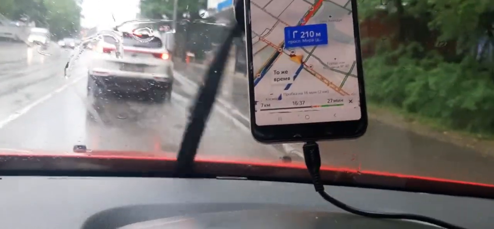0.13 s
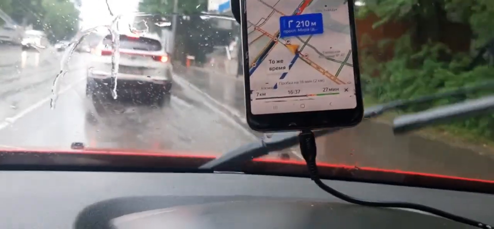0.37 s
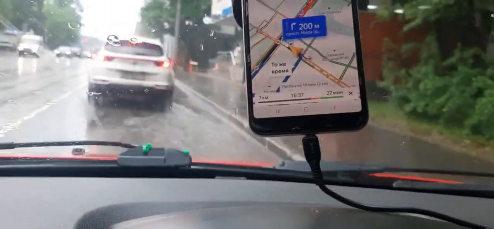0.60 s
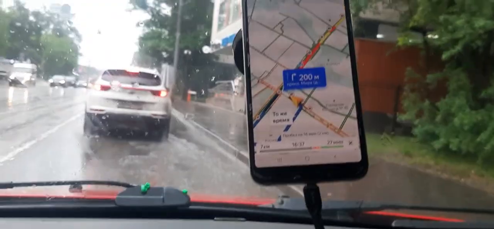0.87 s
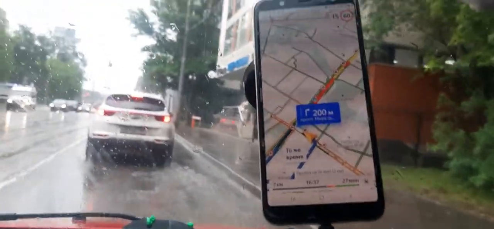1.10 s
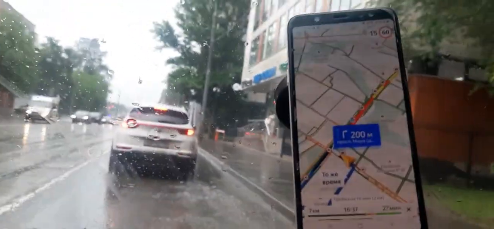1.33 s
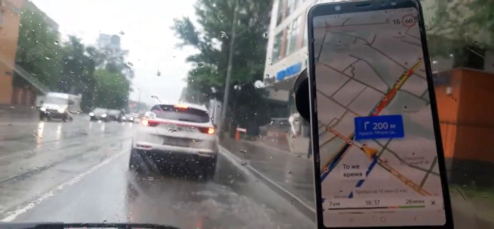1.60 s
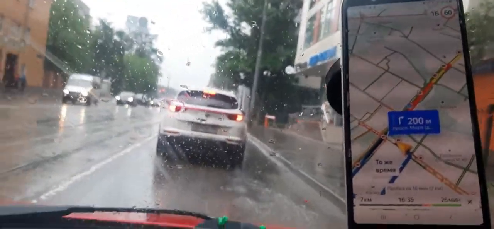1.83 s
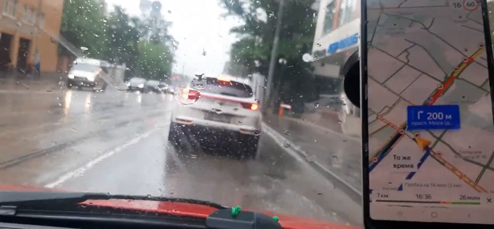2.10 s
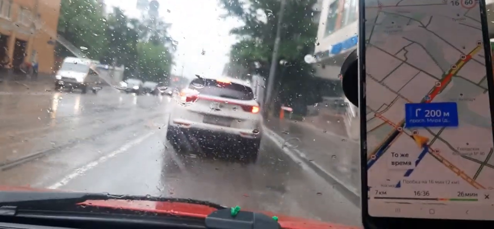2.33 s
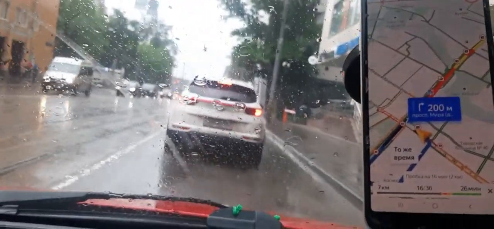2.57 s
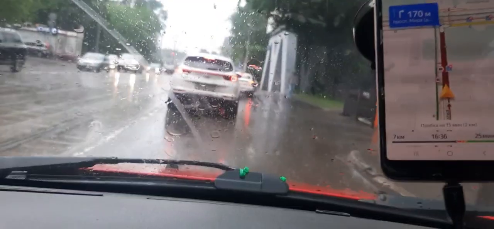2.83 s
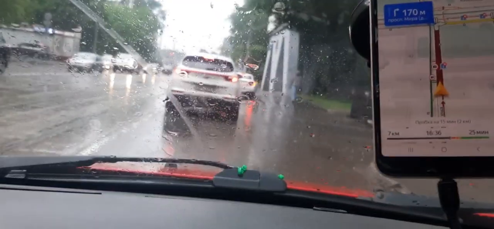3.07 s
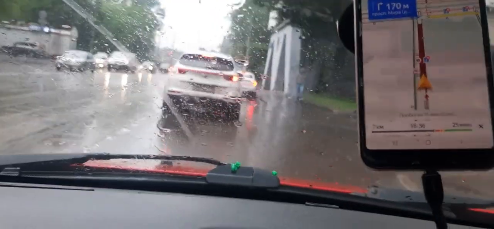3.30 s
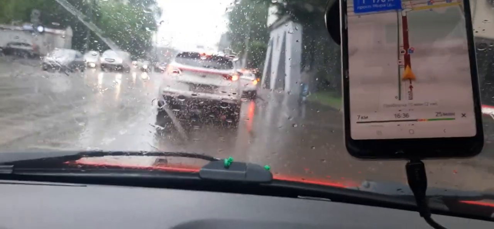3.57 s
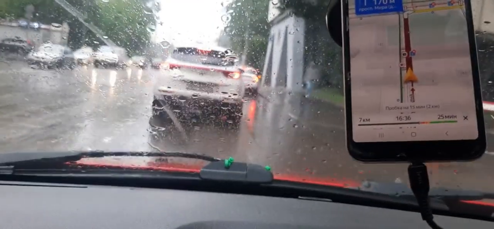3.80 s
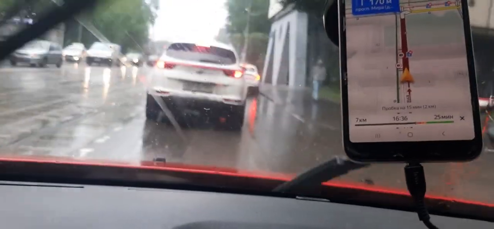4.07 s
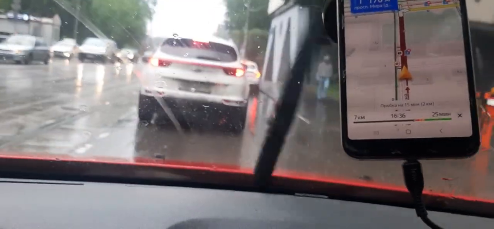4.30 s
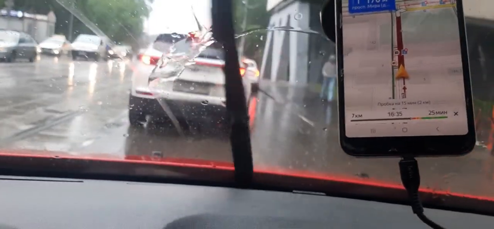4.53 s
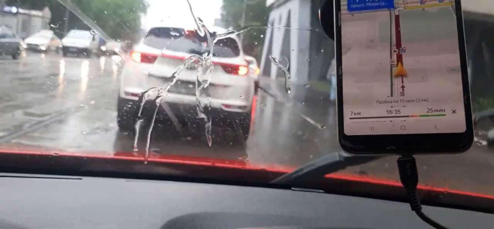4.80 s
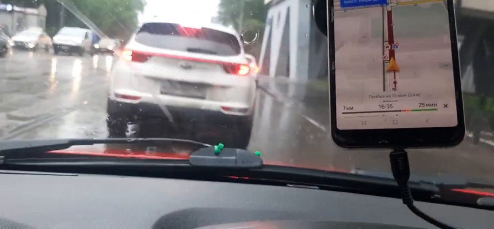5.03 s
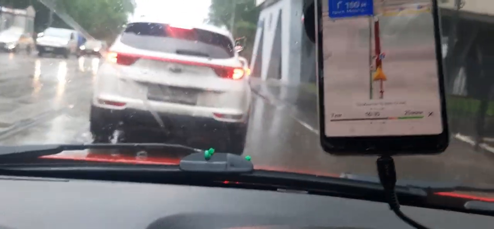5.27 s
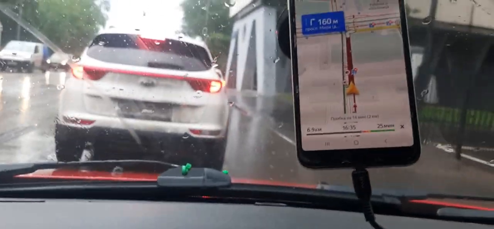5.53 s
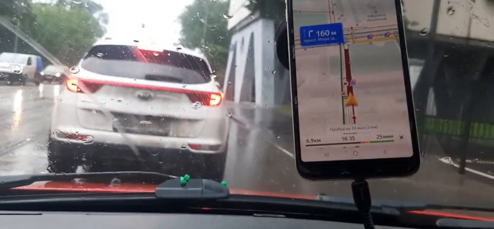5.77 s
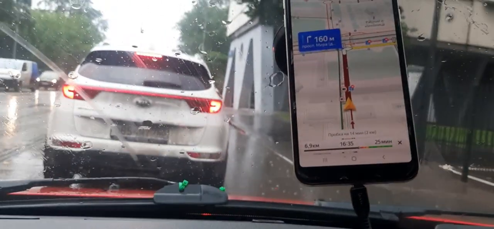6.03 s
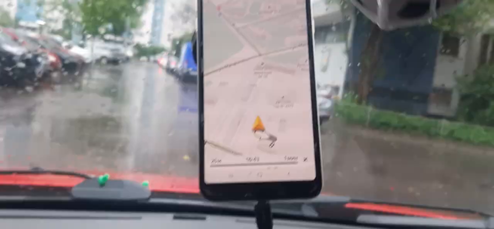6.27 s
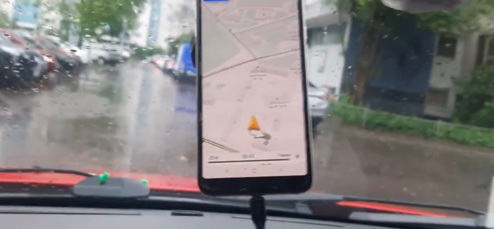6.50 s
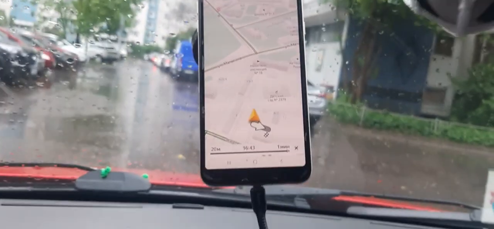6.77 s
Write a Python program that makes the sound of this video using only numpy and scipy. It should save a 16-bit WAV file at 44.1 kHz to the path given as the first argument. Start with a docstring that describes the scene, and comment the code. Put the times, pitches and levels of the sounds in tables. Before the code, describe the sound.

Inside a car creeping through heavy rain, low boom and road rumble under dense patter, wipers groaning and thudding twice, then an abrupt near-silence.

```python
"""Cabin boom and road rumble fill a car creeping through heavy rain: wandering sines over shaped noise.
The wipers groan over the screen twice (band noise, short hoots, thuds, knocks) and tick and clack (noise, modes).
Drops drum on roof and glass: noise bursts with panel modes, dense for the rain, single for the heavy drops.
The rain hisses and sings in narrow bands of noise. The sound thins, cuts, and returns very quietly."""
import sys
import numpy as np
from scipy import signal
from scipy.fft import rfft, irfft, next_fast_len
from scipy.io import wavfile

SR = 44100
rng = np.random.default_rng(int(sys.argv[2]) if len(sys.argv) > 2 else 0)


def natural_amplitude(level_db):
    """Convert a level in decibels to a linear amplitude factor, elementwise."""
    exponent = np.asarray(level_db, float) / 20
    return 10 ** exponent


def to_wav(s):
    """Save 16-bit WAV."""
    ch = np.atleast_2d(s).T  # columns
    pcm = np.round(np.clip(ch, -1, 1) * 32767)  # PCM
    wavfile.write(sys.argv[1], SR, pcm.astype(np.int16))


N = 303408


def evened(x):
    """Scaled to rms 1."""
    return x / np.sqrt(np.mean(x ** 2) + 1e-20)


def read(points, hz):
    """A table read on a log-frequency axis."""
    f, value = np.transpose(points)
    return np.interp(np.log(hz + 1), np.log(f + 1), value)


def track(tables, index):
    """One column of the tables, sample by sample; each table takes over 30 ms before its start."""
    t, out = np.arange(N) / SR, np.zeros(N)
    for rows in map(np.array, tables):
        out = np.where(t >= rows[0, 0] - .03, np.interp(t, rows[:, 0], rows[:, index]), out)
    return out


# Likeness of left and right: f/Hz, correlation
LIKENESS = [(60, 0.9), (120, 0.78), (240, 0.91), (480, 0.58), (950, 0.18), (1890, -0.2), (3770, 0.03),
            (7520, -0.0031), (15000, -0.041)]
# Stereo balance: f/Hz, left over right/dB
BALANCE = [(60, 5), (110, 5.5), (200, 4), (380, 2.5), (700, 3.0), (1290, 7), (2380, 9), (4400, -2),
           (8120, 5), (15000, 3)]


def pair(spectrum, length, peaks=()):
    """Two-channel noise, rms 1: shaped in frequency, alike in the bass, mostly leaning left."""
    hz = np.fft.rfftfreq(length, 1 / SR)
    a, b = rfft(rng.standard_normal((2, length)))
    same = np.clip(read(LIKENESS, hz), -1, 1)
    lean = natural_amplitude(read(BALANCE, hz) / 2)
    resonances_db = sum(top / (1 + (2 * (hz - f) / width) ** 2) for f, width, top in peaks)
    left = a * lean
    right = (same * a + np.sqrt(1 - same ** 2) * b) / lean
    return evened(irfft(np.array([left, right]) * natural_amplitude(read(spectrum, hz) + resonances_db), length))


def slow(hz):
    """Random drift: noise low-passed at hz, rms 1."""
    return evened(signal.sosfilt(signal.butter(2, hz, fs=SR, output="sos"), rng.standard_normal(N)))


def place(mix, s, sound):
    """The mix with a sound laid in at s."""
    at = round(s * SR)
    sound = sound[:, :N - at]
    return mix + np.pad(sound, ((0, 0), (at, N - at - sound.shape[1])))


# Two audible parts, silence between: start/s, end/s
PARTS = [(0, 6.251), (6.277, 6.9)]
# Boom level, with the chance swells and dips of a narrow noise band, one table a part: t/s, level/dB
BOOM_DB = [
    [(0.0, -27), (0.36, -27.5), (0.66, -46), (0.71, -24), (1.02, -44), (1.07, -28), (1.19, -25.5),
     (1.26, -34), (1.49, -25.5), (1.59, -36), (1.75, -26.5), (1.85, -49), (1.94, -28), (2.41, -34),
     (2.48, -23), (2.81, -40.5), (2.87, -26.5), (3.2, -26), (3.26, -28.5), (3.34, -25), (3.41, -21.5),
     (3.46, -77), (3.57, -24.5), (3.84, -26.5), (3.95, -31), (4.04, -33.5), (4.9, -31), (5.13, -45.5),
     (5.21, -30.5), (5.39, -42), (5.44, -37), (6.22, -48)],
    [(6.29, -70), (6.376, -76), (6.656, -75), (6.698, -65.5), (6.88, -76)],
]
# Boom pitch, one table a part: t/s, f/Hz
BOOM_HZ = [
    [(0, 44.5), (2.6, 43.88), (3.4, 46.22), (4.4, 43.65), (4.9, 48.72), (6.24, 47.55)],
    [(6.29, 52.3), (6.88, 53.1)],
]
# Engine note without flutter, one table a part: t/s, f/Hz, level/dB
HUM = [
    [(0, 33.8, -68), (.9, 30.9, -53), (2.8, 36.6, -67), (3.2, 34.26, -68), (4.3, 37.76, -35.5),
     (6.24, 34.8, -48)],
    [(6.29, 35, -105), (6.88, 34.6, -91)],
]
# Road rumble, one table a part: t/s, level/dB
ROAD_DB = [
    [(0, -29), (.47, -27), (1.0, -27.5), (1.5, -28.5), (2.0, -27), (2.4, -25), (2.65, -28), (3.1, -25),
     (3.5, -26.5), (3.9, -25.5), (4.4, -28.5), (4.93, -31), (5.3, -36), (5.6, -39.5), (5.95, -39),
     (6.24, -36)],
    [(6.29, -66), (6.58, -75), (6.88, -77)],
]
# Rumble spectrum: f/Hz, relative density/dB
RUMBLE = [(33, -16), (56, -1), (70, -4), (163, -7), (199, -17), (231, -15.5), (270, -25.5), (307, -21.5),
          (338, -28.5), (371, -24.5), (413, -30), (700, -37), (910, -70), (1540, -120)]
# Rumble spectrum once slowed: f/Hz, relative density/dB
CRAWL = [(33, -22), (56, -3), (86, -11), (119, -13.5), (166, -6), (217, -16.5), (268, -18.5), (426, -21),
         (700, -27), (910, -27), (1540, -120)]
# Slowing down: start/s, end/s
BRAKING = (4.68, 5.37)


def car(octave_db=-10.0, crawl_db=0.0, wander_hz=2.16, flutter_db=2.0, last_lean_db=4.0):
    """Cabin boom with its octave, fading by chance like narrow noise, and an engine note,
    over tyre and body rumble that thins as the car slows."""
    t, sides = np.arange(N) / SR, np.array([[.5], [-.5]])
    turn = 2 * np.pi * np.cumsum(track(BOOM_HZ, index=1) + wander_hz * slow(6.85)) / SR
    tones = np.sin(turn) + natural_amplitude(octave_db) * np.sin(2 * turn)
    boom = np.sqrt(2) * natural_amplitude(track(BOOM_DB, index=1) + flutter_db * slow(23.0)) * tones
    hum_turn = 2 * np.pi * np.cumsum(track(HUM, index=1)) / SR
    hum = np.sqrt(2) * natural_amplitude(track(HUM, index=2)) * np.sin(hum_turn)
    slowed = np.interp(t, BRAKING, [0, np.pi / 2])  # equal-power crossfade
    rumble = np.cos(slowed) * pair(RUMBLE, N) + np.sin(slowed) * natural_amplitude(crawl_db) * pair(CRAWL, N)
    low_tones = (boom + hum) * natural_amplitude(np.array([[2.2], [-2.8]]))
    last_lean = natural_amplitude(sides * last_lean_db * (t > PARTS[0][1]))
    return last_lean * (low_tones + natural_amplitude(track(ROAD_DB, index=1)) * rumble)


# Drag surges as the blades cross the glass: start/s, end/s, level/dB
SWEEPS = [(0.035, 0.18, -33.5), (0.162, 0.321, -28.5), (0.323, 0.584, -33.5), (0.52, 0.7, -34.5),
          (4.512, 4.626, -35), (4.645, 4.742, -32), (4.795, 4.923, -36), (4.955, 5.178, -33.5)]
# Catch and slip, one hoot each, starting 5 ms before t: t/s, level/dB, f/Hz
JUDDERS = [(0.123, -28, 310), (0.202, -31, 171), (0.228, -21, 220), (0.258, -19, 180), (0.28, -24.5, 182),
           (0.356, -17, 162), (0.392, -17, 179.6), (0.408, -14, 162), (0.463, -21, 170), (0.509, -17, 147),
           (0.61, -21.5, 165.5), (4.587, -21.5, 132), (4.645, -26.5, 195), (4.675, -28, 200),
           (4.703, -35, 199), (4.803, -23.5, 206.4), (4.835, -31.5, 282), (5.02, -21.5, 168),
           (5.06, -36, 336), (5.085, -26, 193), (5.149, -32.5, 186)]
GRIP_S, LET_GO_S, HOOT_S = 0.028, 0.057, 0.03


def blades(slip_hz=22., slip_db=2.2):
    """Rubber drags over the glass as flickering low noise, and judders in short low hoots."""
    t = np.arange(N) / SR
    moving = sum(natural_amplitude(db) * np.interp(t, [a, a + GRIP_S, b - LET_GO_S, b], [0, 1, 1, 0]) for a, b, db in SWEEPS)
    drag = pair([(80, -23.0), (200, 9.5), (350, -4.5), (600, -12.0), (1200, -22.5), (3000, -72.0)], N)
    out = moving * natural_amplitude(slip_db * slow(slip_hz)) * drag
    u = np.arange(round(HOOT_S * SR)) / SR
    for s, db, hz in JUDDERS:
        hoot = natural_amplitude(db) * np.sin(2 * np.pi * hz * u) * np.sin(np.pi * u / HOOT_S) ** 2.2
        out = place(out, s - .005, natural_amplitude(np.array([[1.8], [-2.2]])) * hoot)
    return out


# Blade landings after a jump: t/s, level/dB, f/Hz
THUDS = [(.232, -20, 240), (.358, -25, 278), (.397, -16, 294), (0.473, -24, 260), (0.497, -28, 263),
         (4.547, -20.5, 168), (4.696, -23, 300), (4.805, -19, 210), (4.847, -19, 230), (4.877, -24, 230),
         (4.901, -19, 200), (4.92, -16, 190), (5.025, -22, 230), (5.048, -22, 337), (5.074, -23, 300)]
THUD_RISE_S, THUD_T60_S = .001, .03


def thuds(size=2048):
    """A landing blade: a low sine that starts at once and dies in a few cycles."""
    t, out = np.arange(size) / SR, np.zeros((2, N))
    for s, db, hz in THUDS:
        swing = np.sin(2 * np.pi * hz * t) * natural_amplitude(db - 60 * t / THUD_T60_S) * (1 - np.exp(-t / THUD_RISE_S))
        out = place(out, s, natural_amplitude(np.array([[1.8], [-2.2]])) * swing)
    return out


# Dull knocks where a blade flips over: t/s, level/dB, t60/s
KNOCKS = [(0.113, -29.5, 0.074), (0.211, -31, .05), (0.254, -25, 0.06), (.360, -30, .05), (.402, -33, .05),
          (.476, -32, .04), (.500, -29, 0.047), (.558, -25.5, 0.11), (4.583, -27, 0.067),
          (4.69, -34, 0.043), (4.765, -29, 0.055), (5.046, -33, .08), (5.140, -29, 0.062)]
# Knock spectrum: f/Hz, relative density/dB
KNOCK = [(200, -24), (400, 8), (600, 3.5), (800, 0), (1100, -8.5), (1500, -6), (3000, -60)]


def knocks(size=4096):
    """A flipping blade: a short dull noise burst in the lower middle."""
    t, out = np.arange(size) / SR, np.zeros((2, N))
    for s, db, t60 in KNOCKS:
        envelope = natural_amplitude(db - 60 * t / t60) * (1 - np.exp(-t / 0.0031))
        out = place(out, s, envelope * pair(KNOCK, size))
    return out


# Bright ticks of the wiper arms, and last a bright drop with a long hiss:
# t/s, level/dB, t60/s, spectrum tilt below BODY_HZ/dB
TICKS = [(.626, -46, 0.027, -1), (0.6382, -34, 0.077, -3.5), (3.8192, -29, 0.043, 1.5),
         (5.1035, -32.5, 0.053, -4), (5.1294, -36, 0.14, -2), (6.233, -41.5, 0.6, 3)]
# Tick spectrum before the tilt: f/Hz, relative density/dB
TICK = [(880, -27), (1500, -2), (1710, 5), (2320, 2), (3370, 1), (7430, -3), (8880, -15), (10500, -2.5),
        (15900, -7.5)]
BODY_HZ = 8200


def bright_ticks(size=4096):
    """Wiper arm ticks and one last bright drop: noise bursts with a fast and a slower decay."""
    t, out = np.arange(size) / SR, np.zeros((2, N))
    for s, db, t60, body_db in TICKS:
        colour = [(f, level + body_db * (f < BODY_HZ)) for f, level in TICK]
        decay = natural_amplitude(-60 * t / t60) + natural_amplitude(-2.0 - 60 * t / 0.0084)
        out = place(out, s, natural_amplitude(db) * pair(colour, size) * decay * (1 - np.exp(-t / 0.00025)))
    return out


# Linkage clacks: t/s, level/dB, drive length/share of full, crack over level/dB
CLACKS = [(0.2501, -37, 0.4, 11), (4.1172, -22, 1, -1)]
# Linkage modes: f/Hz, relative level/dB, t60/s, full drive time/s
LINKAGE = [(790, 0, .025, .015), (1320, 0, .035, .002), (1500, -9, .05, .004), (1795, -3, .045, .006),
           (2015, 4, .04, .006), (2385, -2, .045, .006), (3150, -13, .025, .003), (3610, -15, .05, .004),
           (3970, -4, .03, .002), (4360, -11, .02, .002), (5720, -15, .03, .006)]
# Crack spectrum: f/Hz, relative density/dB
CRACK = [(300, -35), (700, 3), (2200, 10), (3500, -2), (7500, -10.5), (8700, -45), (11000, -19),
         (16000, -27)]


def linkage_clacks(size=4096):
    """The linkage clacks: modes of unsteady phase, driven then free, under a short noise crack."""
    t, out = np.arange(size) / SR, np.zeros((2, N))
    hz, mode_db, ring, driven = np.transpose(LINKAGE)[..., None]
    for s, db, length, crack_db in CLACKS:
        drive_s = length * driven
        push = np.clip(t / np.minimum(drive_s, .006), 0, 1) * natural_amplitude(-60 * np.maximum(t - drive_s, 0) / ring)
        wobble = np.cumsum(.016 * rng.standard_normal((len(hz), size)), 1)  # rad
        rung = (natural_amplitude(mode_db) * push * np.exp(1j * (2 * np.pi * hz * t + wobble))).sum(0)
        crack = natural_amplitude(crack_db - 60 * t / (length * 0.11)) * pair(CRACK, size)
        sides = np.array([rung.imag, natural_amplitude(0.5) * rung.real])
        out = place(out, s, natural_amplitude(db) * (sides + crack))
    return out


# One dry snap, before side gains: t/s, level/dB
SNAP = (5.357, -18)


def snap():
    """A single click with one short damped swing, mostly on the left."""
    s, db = SNAP
    t = np.arange(200) / SR
    swing = np.cos(2 * np.pi * 1200 * t) * np.exp(-t / .0003) * (1 - np.exp(-t / .00003))
    sides = natural_amplitude(db + np.array([[6.], [-8.]]))
    return place(np.zeros((2, N)), s, sides * swing)


# Rain spectrum: f/Hz, relative density/dB
RAIN = [(240, -8.5), (400, -2), (544, -1.5), (706, -4), (798, -2.5), (1250, -4.5), (1520, -6.5),
        (1920, -4.5), (2070, -4.5), (2650, -8), (3280, -13), (7290, -21.5), (7750, -25), (8630, -37.5),
        (11000, -27.5), (15700, -25.5)]
# Roof and glass modes, before random strike: f/Hz, level/dB, t60/s
PANELS = [(785, -23, 0.026), (1410, -24, 0.093), (1535, -8, 0.2), (1835, -11.5, 0.075), (2083, -1, 0.05),
          (2240, -4, 0.04), (2915, -9, 0.044), (4220, -9.5, 0.0072)]


def splat(t60, ring_db=-8.0, rise_s=0.00022, size=4096):
    """One drop: a broad patter dying in the cabin, plus the panel modes, struck unevenly."""
    t = np.arange(size) / SR
    patter = pair(RAIN, size) * natural_amplitude(-60 * t / t60) * (1 - np.exp(-t / rise_s))
    hz, db, ring = np.transpose(PANELS)[..., None]
    strike = rng.standard_normal((3, len(PANELS), 1))  # level, detuning, right-hand sign
    swing = np.sin(2 * np.pi * hz * (1 + 0.015 * strike[1]) * t)
    modes = natural_amplitude(db + 6.4 * strike[0] - 60 * t / ring) * swing
    sides = np.array([modes.sum(0), natural_amplitude(-17.0) * (modes * np.sign(strike[2])).sum(0)])
    return patter + natural_amplitude(ring_db) * sides


# Heavy drops: t/s, level/dB, left over right/dB
DROPS = [(0.0482, -53, -15), (0.1176, -37.5, -4), (0.3248, -42.5, -7), (0.4155, -43, -3),
         (0.494, -43.5, -7), (0.5586, -37.5, -1.5), (0.9932, -42.5, 0), (1.2819, -61, -4),
         (1.3405, -46, -3), (1.6093, -43, -4), (1.7565, -47, 4), (1.8118, -37, -5), (1.8905, -32.5, -3.5),
         (2.0195, -51, 1), (2.071, -36, -2.5), (2.2498, -38.5, -2), (2.3805, -49, -8), (2.48, -40.5, -7),
         (2.528, -40, -4), (2.5806, -40, -6), (2.8694, -45.5, -1), (3.0177, -43, 9), (3.1743, -41, -6),
         (3.252, -41, -13), (3.2995, -34, -4), (3.4322, -43, 0), (3.465, -40, 1), (3.648, -41, 7),
         (3.8188, -41.5, 1.5), (3.9483, -36, -2.5), (4.2097, -39, 0), (4.4101, -41, 0), (4.49, -46, -10),
         (4.607, -36.5, 0), (4.6994, -39, 0), (4.7689, -36, -3), (4.8698, -41, -8), (5.0584, -46, 1),
         (5.289, -38.5, -2), (5.4207, -41.5, 3.5), (5.89, -44, -3), (5.983, -38.5, -2), (6.0192, -43.5, -2),
         (6.083, -47, 0), (6.1966, -50, -9)]
DROP_T60_S, DROP_RISE_S = 0.19, 0.0024
TAP_DB, TAP_T60_S = 3., .025


def big_drops():
    """Single heavy drops that stand out: a crisp tap and a softer, longer splash."""
    out = np.zeros((2, N))
    for s, db, pan_db in DROPS:
        tap = natural_amplitude(TAP_DB) * splat(TAP_T60_S, ring_db=-16.0)
        drop = splat(DROP_T60_S, 1.0, DROP_RISE_S) + tap
        out = place(out, s, natural_amplitude(db + pan_db * np.array([[.5], [-.5]])) * drop)
    return out


# Thin ticks of drops on the glass: t/s, onset level/dB
SPITS = [(0.56, -36.5), (1.284, -38.5), (1.3066, -35), (1.3684, -34.5), (1.477, -36.5), (1.562, -39),
         (1.61, -35), (1.7565, -35), (1.8905, -31), (1.914, -33.5), (2.022, -41), (2.253, -42),
         (2.306, -40), (2.8767, -32.5), (2.925, -38), (3.1867, -33), (3.517, -34.5), (4.49, -34),
         (5.984, -43)]
# Spit spectrum: f/Hz, relative density/dB
SPIT = [(600, -25), (2000, 0), (3500, 3), (7500, -7), (8700, -23), (11000, -16), (16000, -22)]
SPIT_T60_S = .012


def spits(size=1024):
    """Drops ticking on the glass: very short dry noise bursts."""
    t, out = np.arange(size) / SR, np.zeros((2, N))
    for s, db in SPITS:
        out = place(out, s, natural_amplitude(db - 60 * t / SPIT_T60_S) * pair(SPIT, size))
    return out


# Narrow ring, one table a part: t/s, level re rain before ring_trim_db/dB
SINGING = [
    [(0, -32), (1.2, -20), (1.7, -13), (2.3, -19), (2.7, -15), (3.1, -6), (4.1, -9.5), (5.4, -2.5),
     (6.24, -6)],
    [(6.29, -16), (6.88, -18)],
]
# Ring spectrum: f/Hz, relative density/dB
RING = [(1200, -29), (1480, -5), (1535, 2), (1600, -2.5), (1900, -3.5), (2045, -10), (2150, -16), (2280, 2),
        (2500, -11.5), (3000, -52)]
# Whistle, one table a part: t/s, level re rain before whistle_trim_db/dB
WHISTLING = [
    [(0, -9), (2.8, -21), (3.0, -3), (3.9, -7), (5.4, -6.5), (6.24, -15)],
    [(6.29, -25), (6.88, -29.5)],
]
# Whistle spectrum: f/Hz, relative density/dB
WHISTLE = [(1750, -36), (1960, -4), (2040, 4.5), (2150, -7.5), (2450, -35), (4400, -31), (5300, -13.5),
           (6200, -25), (7000, -45)]


def singing(ring_trim_db=-4.0, whistle_trim_db=-3.0, flicker_db=3.0):
    """Glass and trim sing along with the rain, fitfully: two flickering bands of noise."""
    ring_db = track(SINGING, index=1) + ring_trim_db + flicker_db * slow(17.0)
    whistle_db = track(WHISTLING, index=1) + whistle_trim_db + flicker_db * slow(31.0)
    return natural_amplitude(ring_db) * pair(RING, N) + natural_amplitude(whistle_db) * pair(WHISTLE, N)


# Rain, one table a part: t/s, level/dB
RAINFALL = [
    [(0.0, -40.5), (0.43, -41), (0.66, -42.5), (0.87, -44.5), (1.61, -41.5), (1.82, -40), (2.87, -40),
     (3.15, -39), (3.93, -40), (4.28, -42), (4.99, -41), (5.51, -46.5), (5.75, -47.5), (5.95, -47),
     (6.03, -40.5), (6.07, -50), (6.12, -41.5), (6.18, -47), (6.22, -40.5)],
    [(6.29, -67.5), (6.42, -69), (6.6, -68), (6.88, -67.5)],
]
# Resonances of the spray hiss: f/Hz, width/Hz, peak/dB
CABIN = [(788, 69, 6.5), (1494, 47, 9.5), (2030, 29, 6.5), (2240, 360, 2)]
# Fine rain spectrum, last part: f/Hz, relative density/dB
DRIZZLE = [(60, -22), (100, 1), (166, 0), (244, -23.5), (389, -10), (705, -11), (1350, -4.5), (1570, -5),
           (1750, -7), (2080, -8), (2600, -9), (3190, -16.5), (7290, -19), (8640, -26), (11000, -24),
           (15700, -16)]
# Resonances of the fine rain: f/Hz, width/Hz, peak/dB
SHELTER = [(795, 69, 2.5), (1550, 35, 9), (2070, 60, 8)]


def rain(per_s=500., spread_db=3.5, wash_db=-3.0, gust_db=0.5, kinds=16):
    """A dense random hail of small drops over the hiss of spray; a finer rain, as noise, in the last part."""
    size = natural_amplitude(spread_db * np.minimum(rng.exponential(1, N), 4.5)) * (rng.random(N) < per_s / SR)
    kind = rng.integers(0, kinds, N)
    patter = np.zeros((2, N))
    for k in range(kinds):
        hits = (size * (kind == k))[None]
        patter += signal.oaconvolve(hits, splat(0.073), axes=1)[:, :N]
    heavy = evened(evened(patter) + natural_amplitude(wash_db) * pair(RAIN, N, CABIN))
    fine = natural_amplitude(np.array([[3.], [-.4]]) + 1.7 * slow(11.0)) * pair(DRIZZLE, N, SHELTER)
    both = np.where(np.arange(N) / SR < PARTS[0][1], heavy, fine)
    return natural_amplitude(track(RAINFALL, index=1) + gust_db * slow(2.3)) * (both + singing())


def scene():
    """All sources in the cabin; only car and rain go on into the last part."""
    wipers = blades() + thuds() + knocks() + linkage_clacks()
    events = wipers + bright_ticks() + snap() + big_drops() + spits()
    return car() + events * (np.arange(N) / SR < PARTS[0][1]) + rain()


def top_cut(x):
    """Nothing passes above the cut-off."""
    return signal.sosfilt(signal.butter(12, 16990, fs=SR, output="sos"), x)


# Microphone response: f/Hz, gain/dB
MIC = [(18, -8.5), (33, 0.5), (7900, -1.5), (8300, -12.5), (9200, -4), (10000, -3), (15800, -1.5),
       (16000, -13), (16600, -44), (16900, -78)]


def record(dry):
    """Microphone colour as a linear filter, then a mute between the two parts."""
    t, size = np.arange(N) / SR, next_fast_len(N + SR)
    response = natural_amplitude(read(MIC, np.fft.rfftfreq(size, 1 / SR)))
    heard = irfft(rfft(dry, size) * response, size)[:, :N]
    # 4 ms in (none at t = 0), 1 ms out
    on = sum(np.clip((t - a) / .004 + (a == 0), 0, 1) * np.clip((b - t) / .001, 0, 1) for a, b in PARTS)
    return top_cut(heard * on)


dry = scene()
out = record(dry)
to_wav(out)
```